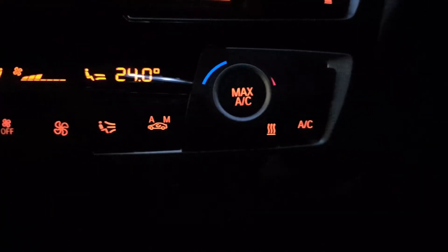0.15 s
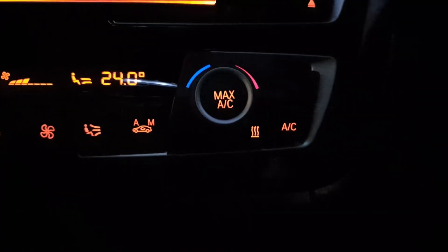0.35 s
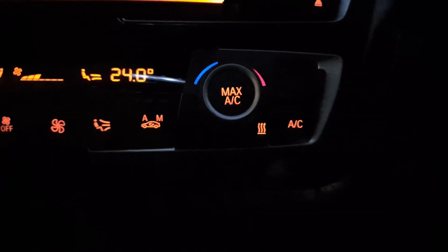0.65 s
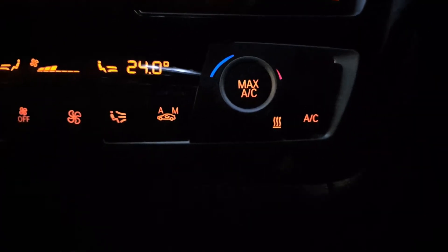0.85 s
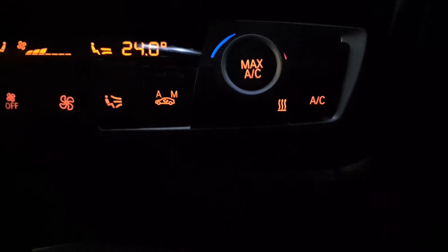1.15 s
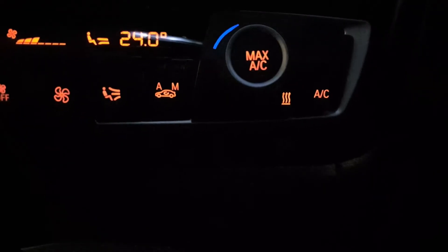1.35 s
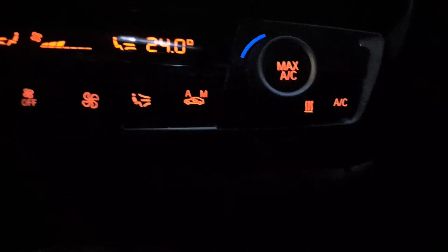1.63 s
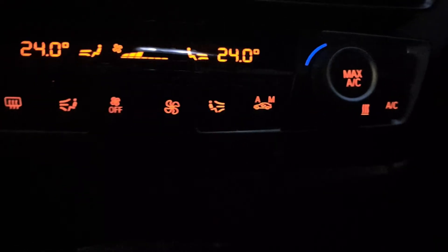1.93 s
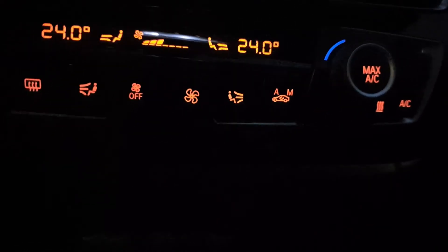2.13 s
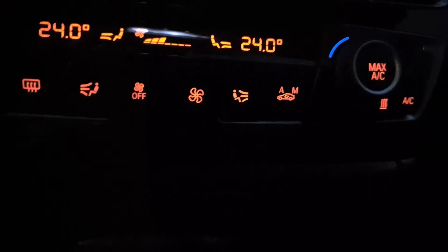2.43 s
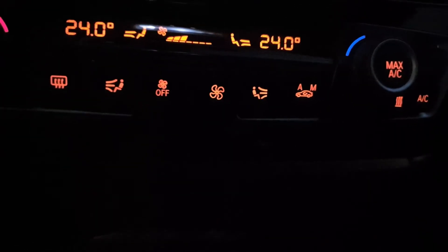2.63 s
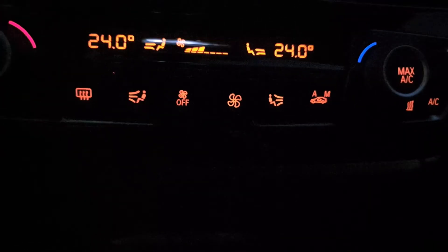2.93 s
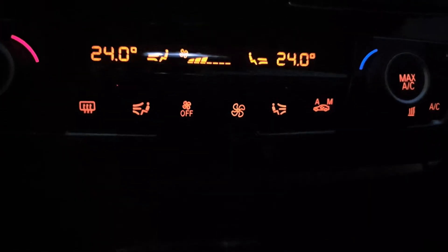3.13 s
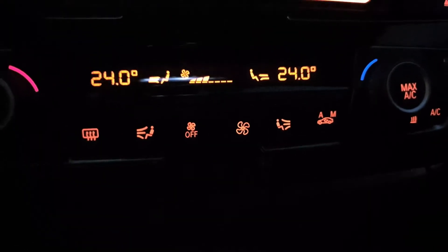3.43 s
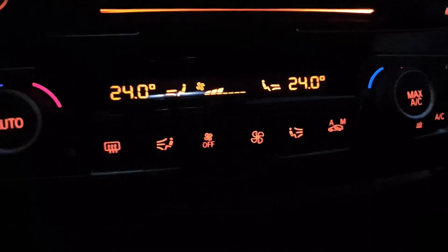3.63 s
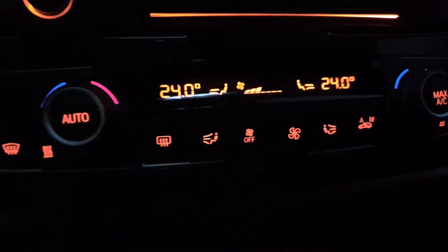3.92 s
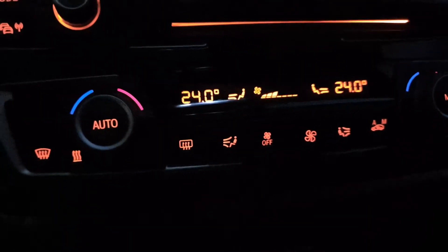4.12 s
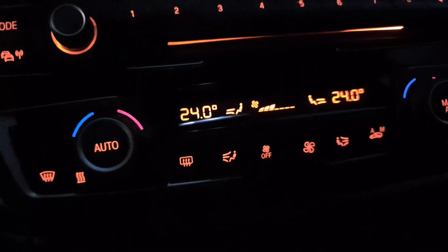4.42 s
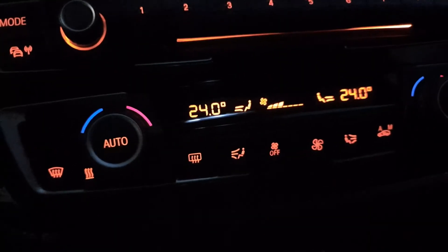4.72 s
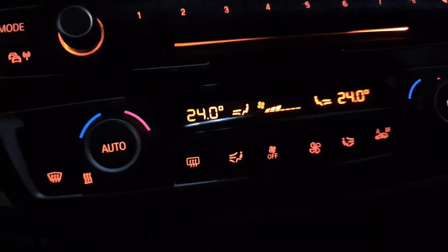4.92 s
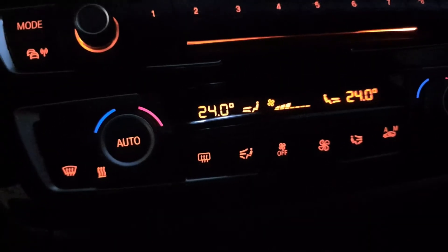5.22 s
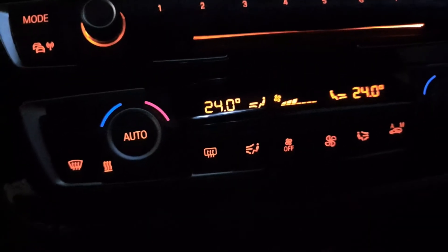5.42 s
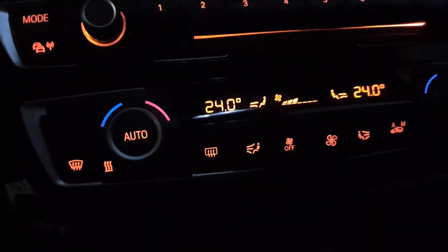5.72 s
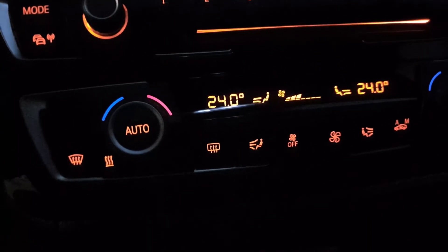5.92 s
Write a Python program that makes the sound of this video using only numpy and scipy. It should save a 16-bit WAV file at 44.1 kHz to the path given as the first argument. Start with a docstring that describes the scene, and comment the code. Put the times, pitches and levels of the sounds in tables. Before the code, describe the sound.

Steady rushing vent air and deep rumble inside a closed car, with light clothing rustle and a few soft handling clicks.

```python
"""A steady roar over a low boom: a climate blower in a closed car, close to a hand-held stereo microphone.
Turbulent air makes broadband noise in the ducts and booms in the cabin; short low tones swell briefly
within the rumble. The motor hums and whines at harmonics of its shaft frequency.
A jacket sleeve rustles by sliding friction as the arm moves, and the grip excites
the damped modes of the housing in a few dull clicks."""
import sys
import numpy as np
from scipy import signal
from scipy.io import wavfile
from scipy.ndimage import uniform_filter1d

SR = 44100
rng = np.random.default_rng(int(sys.argv[2]) if len(sys.argv) > 2 else 0)


def store_pcm(level_fs):
    """Save levels as 16-bit WAV."""
    pcm = np.round(np.clip(level_fs, -1, 1) * 32767).astype(np.int16)
    wavfile.write(sys.argv[1], SR, np.atleast_2d(pcm).T)


N = 267246

# Pan is left minus right level. Spectra give relative level per hertz.
# spectrum of the duct air: f/Hz, level/dB
AIR_SPECTRUM = [(100, -20), (130, -7), (165, -3.5), (210, 0.5), (255, -7), (320, -18), (480, -23.5),
                (590, -24), (800, -32), (1100, -39), (1280, -40.5), (1400, -39.5), (1520, -41.5),
                (1820, -45), (2080, -41.5), (2260, -45), (2550, -46), (2900, -56), (3200, -55), (3800, -56),
                (7400, -68.5), (9000, -62), (12700, -63.5)]
# likeness of the air's sound at the two microphone ports: f/Hz, coherence/1
AIR_COHERENCE = [(40, .99), (90, .98), (170, .84), (215, .9), (300, .75), (500, .45), (900, .3), (1400, .1),
                 (15000, .05)]
# balance of the air's sound between the ports: f/Hz, pan/dB
AIR_PAN = [(40, -2), (100, -0.5), (200, 0), (350, -3), (600, 0.5), (1050, -2), (1400, 4.5), (1800, -5),
           (2200, -7.5), (2700, 0), (3800, -5), (6000, -7.5), (8000, -3), (13000, 0.5)]
# phase by which the left port leads: f/Hz, phase/rad
PORT_PHASE = [(40, .1), (170, .42), (260, .05), (340, -.7), (500, -1.1), (700, -.2)]
# nearness to the vents as the microphone turns: t/s, air and hum gain/dB, extra air treble/dB
VENT_NEARNESS = [(0, 0.5, 6), (1, 2, 2.5), (2, 0, 3), (3, -0.5, 3.5), (4, -1.5, 3.5), (5, -1.5, 7),
                 (6.06, -1, 2.5)]
# spectrum of the cabin boom: f/Hz, level/dB
BOOM_SPECTRUM = [(28, -29), (38, -3), (48, 1), (65, 1.5), (90, 0.5), (115, -11.5), (140, -15.5)]
# envelope of the boom: t/s, level/dB
BOOM_ENVELOPE = [(0.03, -38.5), (0.25, -42), (0.43, -34.5), (0.56, -41), (0.68, -37), (0.81, -42.5),
                 (1.0, -36), (1.22, -42), (1.35, -38), (1.62, -39), (1.95, -39.5), (2.15, -36),
                 (2.45, -41.5), (2.55, -37.5), (3.28, -42.5), (3.37, -37), (3.65, -39.5), (3.75, -42.5),
                 (4.0, -40), (4.55, -40), (4.68, -44), (4.8, -39), (6.02, -42)]
# short low tones within the rumble: t of the crest/s, duration/s, f/Hz, level/dB
LOW_TONES = [(0.096, 0.24, 67.6, -39), (0.431, 0.23, 64.1, -42.5), (0.679, 0.21, 70.24, -31.5),
             (2.167, .2, 69.1, -35.5), (2.36, .16, 47.2, -54)]
# rotation of the motor shaft: t/s, f/Hz
SHAFT_SPEED = [(0, 28.71), (2, 28.66), (4, 28.63), (6.06, 28.62)]
# motor hum: harmonic number, level/dB, pan/dB
HUM_HARMONICS = [(8, -71, 1.5), (10, -68.5, -4.5), (12, -62.5, -3.5), (13, -73.5, -1.5), (15, -73, -1),
                 (16, -74, 2), (18, -76.5, -3), (20, -77, -3), (21, -78, 0), (24, -82.5, 2)]
# commutator whines: harmonic number, partner's harmonic number, partner's amplitude/1, pan/dB, phase/rad
WHINE_BEAMS = [(72, 69, .6, -7., -2.1), (84, 87, .4, -6., 1.1)]
# the microphone's passage through the two beams: t/s, level of harmonic 72/dB, level of harmonic 84/dB
WHINE_LEVELS = [(0, -82.5, -92), (.8, -80, -101.5), (1, -79.5, -99), (1.3, -84, -104), (1.8, -82, -81),
                (2.3, -82.5, -83.5), (2.9, -83, -79), (3.2, -86.5, -80), (3.45, -76.5, -77.5),
                (3.7, -85, -78), (4.3, -82.5, -92.5), (5, -94, -89), (6.06, -83, -88)]
# unsteadiness of each whine: relative amplitude of the noise skirt/1, rms waver/dB
WHINE_ROUGHNESS = [(.7, 2.0), (.45, 1.5)]
# faint harmonics around each whine: offset in harmonic number, relative level/dB
WHINE_SIDEBANDS = [(-1, -15), (1, -15), (4, -16), (7, -17)]
# spectra of the cloth's swish, dull scrape and thin sizzle: f/Hz, level/dB
SWISH_SPECTRUM = [(1700, -8), (2300, -2.5), (3000, -7.5), (3600, -1.5), (4300, -5.5), (5000, -7.5),
                  (6300, -10), (7500, -14.5), (9500, -21)]
SCRAPE_SPECTRUM = [(200, -19), (400, 12), (900, 4.5), (1400, 4), (2400, -3), (3200, -7.5), (4500, -31.5)]
SIZZLE_SPECTRUM = [(6500, -19), (8500, -3.5), (10500, -1), (12000, -6), (12700, -11), (13300, -14),
                   (14500, -15.5), (15600, -25)]
# balance of the cloth's sound between the ports: f/Hz, pan/dB
CLOTH_PAN = [(300, -12.5), (1300, -1), (2700, -5), (3300, -0.5), (5000, 0.5), (7500, 8), (10500, -7),
             (14000, 8)]
# likeness of the cloth's sound at the ports: f/Hz, coherence/1
CLOTH_COHERENCE = [(100, 0.14), (1500, 0.026)]
# sleeve strokes: t at full strength/s, rise/s, hold/s, fall/s, swish level/dB, scrape level/dB,
# sizzle level/dB, swish pan/dB, scrape pan/dB
SLEEVE_STROKES = [(0.985, 0.12, 0.001, 0.13, -88, -65, -88, -3, -7),
                  (1.165, 0.1, 0.001, 0.067, -67, -53, -69.5, -22, -17),
                  (1.29, 0.082, 0.015, 0.07, -80, -67.5, -80, -8, -9),
                  (1.339, 0.014, 0.034, 0.04, -71.5, -59, -72.5, -18, -14),
                  (1.481, 0.14, 0.001, 0.24, -72, -58, -74, -19, -13),
                  (1.578, 0.077, 0.001, 0.2, -61.5, -52.5, -72, -24, -16),
                  (1.778, 0.12, 0.069, 0.21, -69.5, -61, -79, -16, -7.5),
                  (2.11, 0.25, 0.001, 0.16, -85, -64, -96, -14, 5),
                  (2.236, 0.29, 0.044, 0.16, -64, -65.5, -77, -11, 0),
                  (2.491, 0.074, 0.089, 0.17, -66, -77, -80.5, -10, 14),
                  (2.617, .1, 0.077, 0.099, -71, -87, -93, -17, -3),
                  (3.45, 0.13, 0.001, 0.37, -81, -72, -95, -5, -3),
                  (3.98, 0.21, 0.1, 0.25, -81, -73, -89, -10, 0),
                  (4.143, 0.11, 0.001, 0.18, -69.5, -72, -85, -11, 7),
                  (4.24, .1, 0.001, 0.062, -77, -74, -84, -6, -1),
                  (4.546, 0.23, 0.041, 0.11, -83, -89, -74.5, 2, 0.5),
                  (4.584, 0.08, 0.18, 0.19, -66.5, -70, -73, -7, 2),
                  (4.917, 0.12, 0.024, 0.18, -78.5, -85, -72.5, -10, 11),
                  (4.984, .1, 0.044, 0.2, -100, -92, -78, 1.5, 8),
                  (5.11, 0.065, 0.061, 0.05, -90, -92, -78, 1.5, 8),
                  (5.142, 0.055, 0.038, 0.12, -69, -78, -83, -6, 2),
                  (5.406, 0.1, 0.045, 0.33, -82, -76, -75, 0, 15),
                  (5.508, 0.13, 0.15, 0.29, -69.5, -70.5, -77, -7, 3.5),
                  (5.943, 0.19, 0.0011, .1, -81, -90, -79.5, -2, 5),
                  (6.05, 0.049, 0.001, .1, -70.5, -94, -85, -13, 1)]
# rustle between strokes: swish level/dB, scrape level/dB, sizzle level/dB
RESTING_RUSTLE = (-87, -91.5, -96.5)
# focused rubs of the cloth: t/s, duration/s, centre f/Hz, bandwidth/Hz, level/dB, pan/dB
CLOTH_RUBS = [(1.555, 0.094, 3005, 1200, -59, -23), (1.765, 0.13, 3480, 900, -67, -19),
              (2.468, 0.18, 3760, 800, -67, -10), (4.53, 0.31, 11300, 1800, -79, 3),
              (5.07, .125, 11500, 1800, -75, -1), (5.36, 0.33, 11400, 1800, -76, -1),
              (3.369, 0.18, 1152, 497, -69.5, 20), (3.934, 0.063, 3600, 300, -78, -8),
              (4.061, 0.12, 3430, 352, -66.5, -17), (4.215, 0.046, 3600, 250, -71, -16),
              (4.57, 0.24, 4340, 900, -71, -9), (4.88, 0.088, 4220, 900, -77, -7),
              (5.112, 0.095, 4320, 1000, -69.5, -11), (5.41, 0.25, 4270, 1100, -71.5, -10),
              (5.894, 0.091, 2516, 1100, -70.5, -12)]
# grip clicks: t/s, peak level/dB, pan/dB, factor on the mode frequencies/1
GRIP_CLICKS = [(.573, -49, -30, 1.06), (.683, -43, -27, 0.97), (0.985, -54.5, -14, 1.7),
               (0.997, -55, -12, 1.9), (1.073, -34, -28, 0.44), (1.145, -29.5, -34, 0.24),
               (1.167, -46.5, -22, 1.8), (1.278, -50, -24, 1.3), (1.291, -51.5, -23, 1.7),
               (1.756, -43, -32, 0.37), (2.0937, -35, -7, 1.0), (2.113, -46.5, -22, 0.87),
               (2.252, -38.5, -9, 0.42)]
# modes of the housing: f/Hz, relative level/dB, T60/s
HOUSING_MODES = [(456, -15, 0.0049), (670, 14, 0.0076), (900, 3.5, 0.0084), (2030, -5.5, 0.0045),
                 (3820, -13, 0.004)]

AIR_DB, BAND_LIMIT_HZ = -50.5, 15650
STROKE_EDGE_DB = 20  # gained over a stroke's rise, lost over its fall


def gain_of(db):
    """Amplitude grows tenfold for every 20 dB."""
    return 10 ** (np.asarray(db) / 20)


def unit_rms(x):
    """Division by the rms value gives unit mean power."""
    return x / np.sqrt(np.mean(x ** 2) + 1e-20)


def at_frequency(points, hz):
    """Interpolation on a logarithmic frequency axis."""
    f, value = np.transpose(points)
    return np.interp(np.log(hz + 1), np.log(f + 1), value)


def curves(rows):
    """Linear interpolation in time gives each column at every sample."""
    times, *columns = np.transpose(rows)
    return [np.interp(np.arange(N) / SR, times, column) for column in columns]


def pan(pan_db):
    """Constant-power panning: left and right gains with a mean square of 1."""
    pair = gain_of(np.array([pan_db / 2, -pan_db / 2]))
    return pair / np.sqrt((pair ** 2).mean(0))


def add(mix, start, sound):
    """Superposition of a short stereo sound on the mix."""
    part = mix[:, round(start * SR):][:, :sound.shape[1]]
    part += sound[:, :part.shape[1]]


def wander(hz):
    """Sinusoids of random phase in the decade below hz sum to a fluctuation of unit rms."""
    t = np.arange(N) / SR
    rates = np.geomspace(hz / 10, hz, num=12)
    return unit_rms(sum(np.sin(2 * np.pi * (f * t + rng.random())) for f in rates))


def band_modulator(shape, width_hz):
    """Amplitude modulation by this low-passed noise spreads a tone into a band of the given width."""
    pole = np.exp(-np.pi * width_hz / SR)
    return unit_rms(signal.lfilter([1], [1, -2 * pole, pole * pole], rng.standard_normal(shape)))


def stereo_noise(spectrum, coherence, balance, patchy_db, size):
    """Fourier synthesis of partly coherent noise of unit rms, with narrow drifting peaks and dips."""
    frames, hz = 4 * N // size + 5, np.fft.rfftfreq(size, 1 / SR)
    left_re, left_im, own_re, own_im, patches = rng.standard_normal((frames, len(hz), 5)).T
    patches = unit_rms(uniform_filter1d(uniform_filter1d(patches, size=4, axis=0), size=30, axis=1))
    patches *= np.clip(hz / 800, .3, 1)[:, None]  # low frequencies drift less
    likeness = np.clip(at_frequency(coherence, hz), -1, 1)[:, None]
    left = left_re + 1j * left_im
    shared = likeness * np.exp(-1j * at_frequency(PORT_PHASE, hz))[:, None] * left
    right = shared + np.sqrt(1 - likeness ** 2) * (own_re + 1j * own_im)
    in_band = (hz >= spectrum[0][0]) & (hz <= spectrum[-1][0])
    port_gains = in_band * pan(at_frequency(balance, hz))
    colour = gain_of(at_frequency(spectrum, hz)[:, None] + patchy_db * patches)
    bins = np.array([left, right]) * port_gains[:, :, None] * colour
    return unit_rms(signal.istft(bins, nperseg=size, noverlap=3 * size // 4)[1][:, :N])


def cloth_rubs():
    """Friction in brief rubs of the cloth gives bands of hiss with soft ends."""
    out = np.zeros((2, N))
    for start, length, hz, width_hz, db, pan_db in CLOTH_RUBS:
        t = np.arange(0, length, 1 / SR)
        band = band_modulator((2, 16000), width_hz)[:, :len(t)] * np.sin(2 * np.pi * hz * t)
        band *= signal.windows.tukey(len(t), .6)
        add(out, start, pan(pan_db)[:, None] * gain_of(db) * band)
    return out


def stroke_gains():
    """Incoherent sounds add in power: the strokes sum to stereo gains for swish, scrape and sizzle."""
    t = np.arange(N) / SR
    power = gain_of(RESTING_RUSTLE)[:, None, None] ** 2 * np.ones((2, N))
    for onset, rise, hold, fall, *db, swish_pan, scrape_pan in SLEEVE_STROKES:
        away = np.maximum((onset - t) / rise, 0) + np.maximum((t - onset - abs(hold)) / fall, 0)
        sizzle_pan = min(scrape_pan, 0)  # follows the scrape to the right only
        peaks = pan(np.array([swish_pan, scrape_pan, sizzle_pan])).T * gain_of(db)[:, None]
        power += (peaks[:, :, None] * gain_of(-STROKE_EDGE_DB * away)) ** 2
    return np.sqrt(power)


def sleeve_rustle():
    """Sliding friction of cloth on cloth radiates three finely fluttering hisses."""
    flutter = gain_of(0.57 * wander(60))
    hisses = [stereo_noise(spectrum, CLOTH_COHERENCE, CLOTH_PAN, patchy_db=2.0, size=256)
              for spectrum in (SWISH_SPECTRUM, SCRAPE_SPECTRUM, SIZZLE_SPECTRUM)]
    return flutter * (stroke_gains() * hisses).sum(0)


def grip_clicks():
    """A soft impact excites the housing's normal modes, which decay exponentially."""
    t, out = np.arange(1500) / SR, np.zeros((2, N))
    attack = (1 - np.exp(-t / .001)) ** 2
    for start, peak_db, pan_db, pitch in GRIP_CLICKS:
        modes = [gain_of(db - 60 * t / t60) * np.sin(2 * np.pi * hz * pitch * t)
                 for hz, db, t60 in HOUSING_MODES]
        ring = -attack * sum(modes)
        add(out, start, pan(pan_db)[:, None] * gain_of(peak_db) * ring / abs(ring).max())
    return out


def commutator_whine(shaft_angle):
    """Two high shaft harmonics each beat with a weaker partner three harmonics away."""
    out = np.zeros((2, N))
    for beam, db, (skirt, waver_db) in zip(WHINE_BEAMS, curves(WHINE_LEVELS), WHINE_ROUGHNESS):
        harmonic, partner, partner_gain, pan_db, left_lead = beam
        phase = np.array([[left_lead], [0]])
        brush_noise = skirt * band_modulator((2, N), width_hz=190)
        tone = (1 + brush_noise) * np.sin(harmonic * shaft_angle + phase)
        tone += partner_gain * np.sin(partner * shaft_angle + phase)
        for offset, side_db in WHINE_SIDEBANDS:  # from uneven commutator bars
            side_phase = phase + 2 * np.pi * rng.random()
            tone += gain_of(side_db) * np.sin((harmonic + offset) * shaft_angle + side_phase)
        out += pan(pan_db)[:, None] * np.sqrt(2) * gain_of(db + waver_db * wander(8)) * tone
    return out


def motor_hum(shaft_angle):
    """Periodic motion radiates a harmonic series; each partial wavers in level."""
    near_db, _ = curves(VENT_NEARNESS)
    out = np.zeros((2, N))
    for harmonic, db, pan_db in HUM_HARMONICS:
        waver_db = .8 if harmonic == 12 else 2.5
        left_lead = at_frequency(PORT_PHASE, harmonic * SHAFT_SPEED[0][1])
        phase = 2 * np.pi * rng.random() + np.array([[left_lead], [0]])
        tone = np.sqrt(2) * np.sin(harmonic * shaft_angle + phase)
        out += pan(pan_db)[:, None] * gain_of(db + near_db + waver_db * wander(9)) * tone
    return out


def motor():
    """Hum and whine are phase-locked to the shaft angle, the integral of a slightly unsteady speed."""
    shaft_hz = curves(SHAFT_SPEED)[0] * (1 + 0.00046 * wander(2.5))
    shaft_angle = 2 * np.pi * np.cumsum(shaft_hz) / SR
    return motor_hum(shaft_angle) + commutator_whine(shaft_angle)


def low_tones():
    """Short low tones swell briefly within the rumble: sinusoids under a raised-cosine envelope."""
    out = np.zeros((2, N))
    for crest, length, hz, db in LOW_TONES:
        t = np.arange(0, length, 1 / SR)
        tone = np.sqrt(2) * np.sin(2 * np.pi * (hz * t + rng.random())) * np.hanning(len(t))
        port_gains = pan(at_frequency(AIR_PAN, hz))[:, None]
        add(out, max(crest - length / 2, 0), port_gains * gain_of(db) * tone)
    return out


def cabin_boom():
    """Turbulence in the cabin's air gives low-frequency noise that throbs unevenly."""
    rumble = stereo_noise(BOOM_SPECTRUM, AIR_COHERENCE, AIR_PAN, patchy_db=-2, size=4096)
    power = uniform_filter1d(uniform_filter1d((rumble ** 2).mean(0), size=3000), size=3000)
    surge = np.sqrt(abs(power) + 0.00092)
    levelled = unit_rms(rumble / surge ** 0.84)  # partly evens out the noise's own surges
    return gain_of(curves(BOOM_ENVELOPE)[0] + 1.6 * wander(14)) * levelled


def duct_roar():
    """Turbulent flow from the vents radiates broadband noise, more directional in the treble."""
    near_db, treble_db = curves(VENT_NEARNESS)
    flow = stereo_noise(AIR_SPECTRUM, AIR_COHERENCE, AIR_PAN, patchy_db=2.0, size=2048)
    body = signal.sosfiltfilt(signal.butter(2, 1000, fs=SR, output="sos"), flow)
    treble = flow - body
    return gain_of(AIR_DB + near_db) * (body + gain_of(treble_db) * treble)


def scene():
    """The sound pressures of all sources superpose at the microphone."""
    blower = duct_roar() + cabin_boom() + low_tones() + motor()
    return blower + sleeve_rustle() + cloth_rubs() + grip_clicks()


def record(dry):
    """The microphone acts as a band-pass filter, cutting the deepest bass and the highest treble."""
    bass_cut = signal.sosfilt(signal.butter(6, 40, "high", fs=SR, output="sos"), dry)
    low_pass = signal.firwin(511, BAND_LIMIT_HZ, window=("kaiser", 9), fs=SR)
    return signal.oaconvolve(bass_cut, low_pass[None], "same")


dry = scene()
out = record(dry)
store_pcm(out)
```